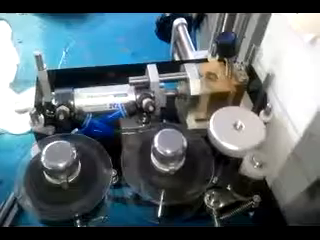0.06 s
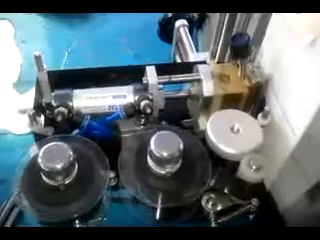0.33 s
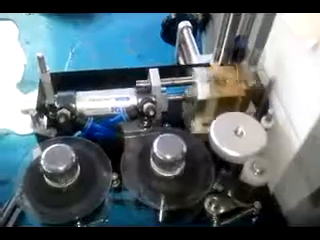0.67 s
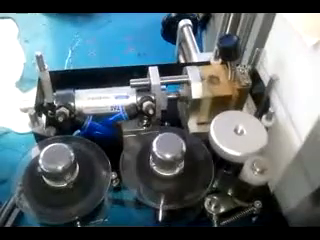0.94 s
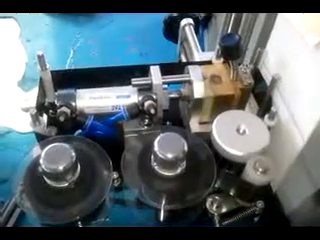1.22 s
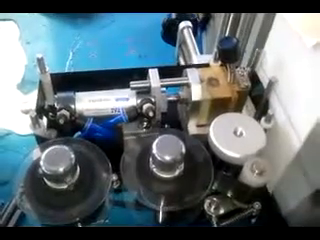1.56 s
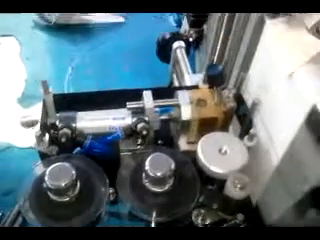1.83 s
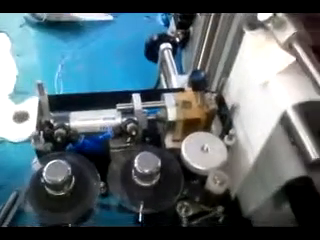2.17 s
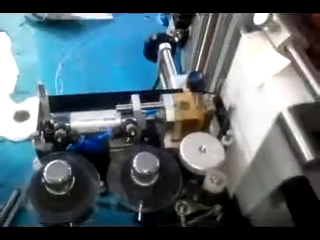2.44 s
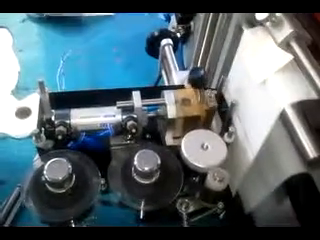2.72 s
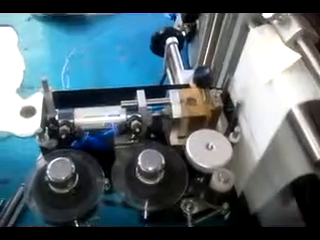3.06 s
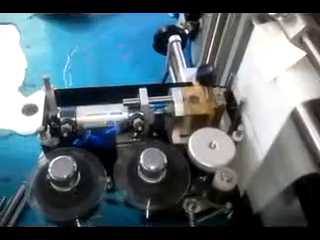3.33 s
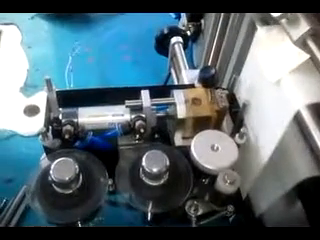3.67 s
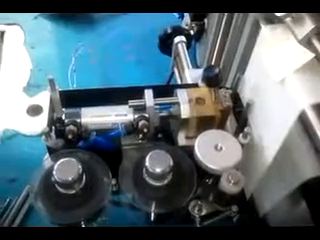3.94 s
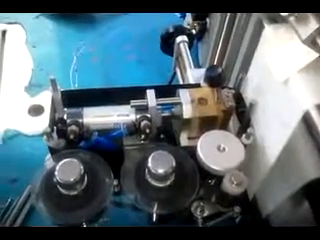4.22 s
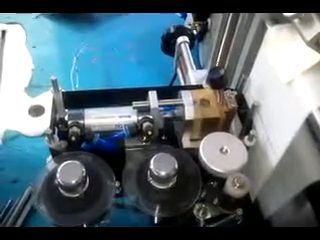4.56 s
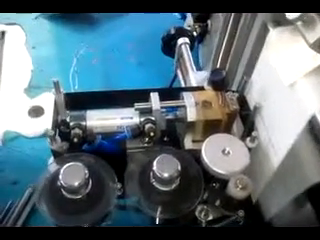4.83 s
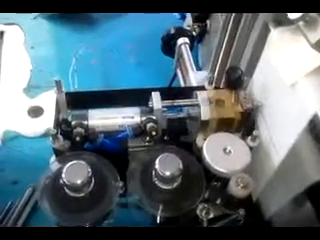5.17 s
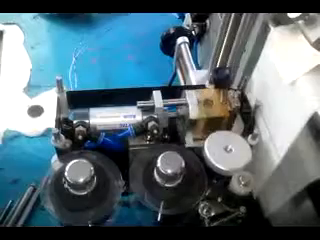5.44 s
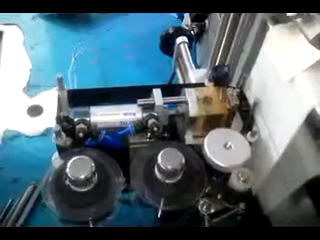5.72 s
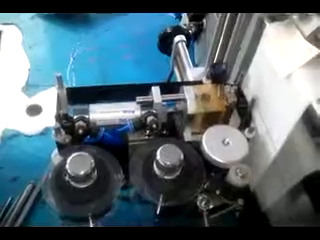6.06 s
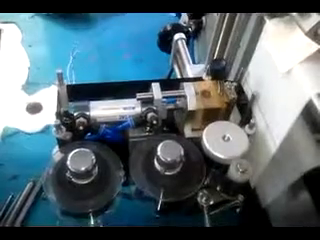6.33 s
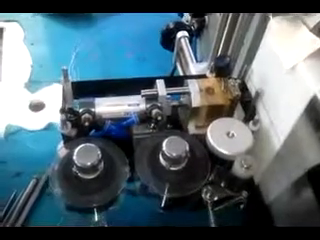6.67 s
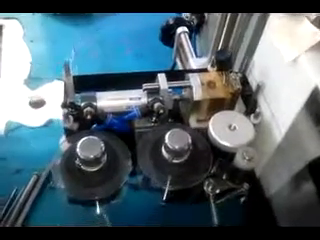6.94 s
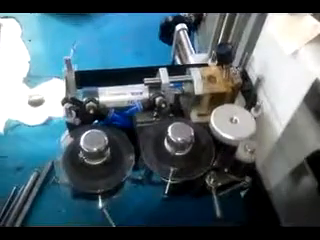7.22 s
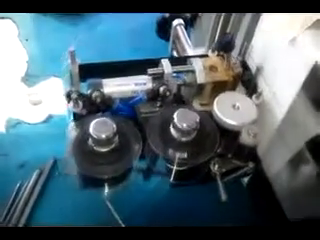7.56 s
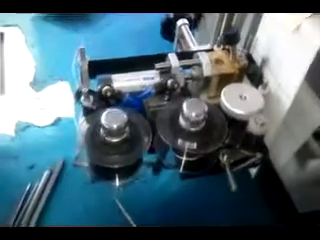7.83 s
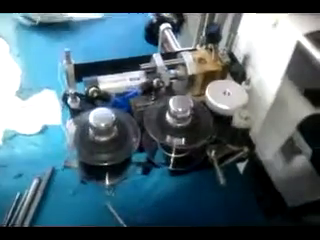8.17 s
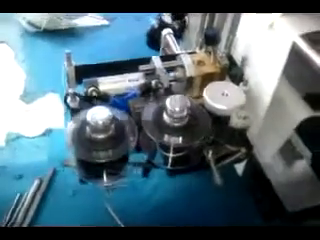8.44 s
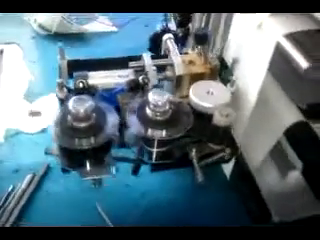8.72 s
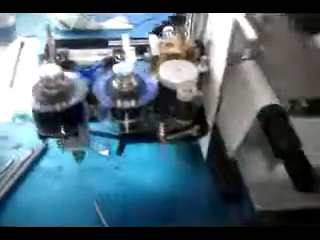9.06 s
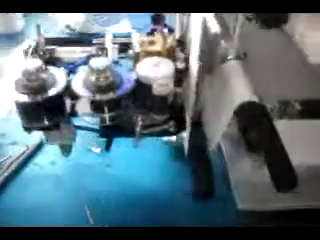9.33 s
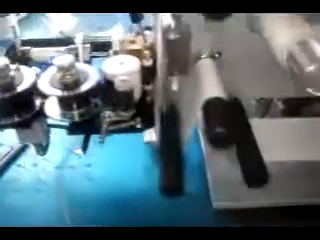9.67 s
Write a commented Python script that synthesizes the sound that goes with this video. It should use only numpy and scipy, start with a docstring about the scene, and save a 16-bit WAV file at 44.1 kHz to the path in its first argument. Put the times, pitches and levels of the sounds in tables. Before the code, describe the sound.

A small pneumatic labelling machine runs close to the microphone in a workshop, with motor hum, fan noise, low rumble and whirring gears throughout. A valve pops with a short hiss right at the start and again at 0.5 seconds, then a metal slide clacks and rebounds at 0.8. A clamp snaps shut at 2.5 seconds amid soft, dull rushes of air. From 3.4 to 4.3 rollers draw the label strip with a grainy rub. The valve pops again at 4.7 and 5.2, with a faint squeak between and several light ticks, and the slide clacks at 5.5. A thin, quiet motor whine follows, fading slowly after the clamp snaps again at 7.1. The rubbing returns from about 7.3 to 8.9. At 9.1 an air jet hisses for half a second, the valve pops once more at 9.3, and a sharp tick follows at 9.7.

```python
"""A pneumatic labelling machine in a small workshop, close to a phone microphone. Over motor hum and
a fan, a solenoid valve pops and vents as the cylinder goes out and back, and the slide clacks on its stop.
The label clamp snaps shut, then rollers draw the rubbing label web. From 4.7 s the cycle runs again,
now with a roller's squeak and a stepper's whine ahead of the clamp. At 9 s an air jet blows
and the valve starts a third cycle."""
import sys
import numpy as np
from scipy import signal
from scipy.fft import irfft, next_fast_len
from scipy.io import wavfile
from scipy.ndimage import uniform_filter1d

SR = 44100
rng = np.random.default_rng(int(sys.argv[2]) if len(sys.argv) > 2 else 0)


def put_to_file(sound):
    """Save the sound as 16-bit audio at rate SR, in the file named by the first command-line argument."""
    columns = np.atleast_2d(sound).T  # one column per channel
    safe = np.clip(columns, -1, 1)
    whole_steps = np.round(safe * 32767)
    wavfile.write(sys.argv[1], SR, whole_steps.astype(np.int16))


N = 431738
TIME = np.arange(N) / SR
AFTER = np.arange(SR // 4) / SR  # seconds after a blow
LEAD_IN_S = .03  # a faint hiss starts this long before each pop
TOP_HZ = 9750  # upper limit of the phone microphone


# click of the solenoid's armature: f/Hz, level/dB
ARMATURE_COLOUR = [(2400, -23), (3400, -6), (4800, -20), (6300, -10), (7100, -4.5), (8000, -4), (9300, -25)]
def valve(switches, flow, port, modes, click_db, knock_db, seat_s, seat_db, pop_db, pop_s):
    """The armature clicks, air vents through the port with a pressure pop, the spool knocks and seats."""
    out = np.zeros(N)
    for s, db in switches:
        gain = amp(db)
        add(out, s - .0112, gain * amp(click_db) * noise(ARMATURE_COLOUR, len(AFTER)) * fade(0.038))
        add(out, s - LEAD_IN_S, gain * noise(port, len(AFTER)) * flow)
        add(out, s, -gain * amp(pop_db) * np.sin(np.pi * AFTER / pop_s) * np.exp(-AFTER / pop_s))
        add(out, s + pop_s / 2, gain * amp(knock_db) * ring(modes, tilt_db=-2.5))
        add(out, s + seat_s, gain * amp(seat_db) * ring(modes))
    return out


def airflow(lead_in_db, gust_db, gust_rise_s, gust_t60,
            puff_s, puff_rise_s, puff_hold_s, puff_db, puff_t60):
    """Envelope of one stroke: a faint hiss, a gust as the chamber vents, a puff as the piston lands."""
    t = AFTER - LEAD_IN_S
    lead_in = amp(lead_in_db) * gate(-LEAD_IN_S, 0, LEAD_IN_S / 2, gust_t60, t)
    gust = amp(gust_db) * gate(0, gust_rise_s, gust_rise_s, gust_t60, t)
    puff = amp(puff_db) * gate(puff_s - puff_rise_s, puff_s + puff_hold_s, puff_rise_s, puff_t60, t)
    return np.sqrt(lead_in ** 2 + gust ** 2 + puff ** 2)


# valve switches for the outward stroke: t/s, level/dB
PUSHES = [(0.0333, -13), (4.735, -12.5), (9.336, -15)]
# its exhaust port: f/Hz, level/dB
PUSH_PORT = [(71, -18), (120, 3), (167, 4), (216, -9.5), (369, -15.5), (486, -17), (909, -9), (1760, -16.5),
             (2010, -10.5), (3480, -12), (3960, -13), (4770, -18), (7010, -11), (8750, -21), (9770, -50),
             (12700, -68), (21500, -120)]
# valve body as it opens: f/Hz, level/dB, t60/s
OPEN_MODES = [(190, -21, 0.018), (722, -8.5, 0.039), (1120, -1.5, 0.048), (1820, -6, 0.044),
              (2546, 2, 0.051), (4160, -1, 0.023), (6830, 6, .02), (7300, 2.5, .02)]
def push_strokes():
    """The valve opens with a short gust and pushes the cylinder out."""
    flow = airflow(lead_in_db=-16.5, gust_db=2, gust_rise_s=0.005, gust_t60=0.03,
                   puff_s=0.036, puff_rise_s=0.03, puff_hold_s=0.017, puff_db=-12, puff_t60=0.073)
    return valve(PUSHES, flow, PUSH_PORT, OPEN_MODES,
                 click_db=-6.5, knock_db=6.5, seat_s=.004, seat_db=3, pop_db=5, pop_s=0.00211)


# valve switches for the return stroke: t/s, level/dB
RETURNS = [(0.5209, -14), (5.2219, -14)]
# its exhaust port: f/Hz, level/dB
RETURN_PORT = [(71, -25), (120, -3), (343, -6.5), (892, -9.5), (1760, 0.5), (2080, -6), (2320, -2),
               (3060, -4.5), (3750, -6.5), (4110, -8), (5620, -12), (6280, -8), (7280, -14), (8590, -15),
               (9770, -47), (12700, -68), (21500, -120)]
# valve body as it shuts: f/Hz, level/dB, t60/s
SHUT_MODES = [(189, -4.5, 0.019), (1020, -8, 0.023), (1850, -13, 0.028), (2240, -2, 0.061),
              (2575, 8, 0.016), (5450, -1, .025), (6950, 6, 0.021), (7540, 0.5, 0.034)]
def return_strokes():
    """The valve shuts with a longer gust and lets the cylinder back."""
    flow = airflow(lead_in_db=-19, gust_db=-2, gust_rise_s=0.00082, gust_t60=0.11,
                   puff_s=.081, puff_rise_s=.014, puff_hold_s=.009, puff_db=-10, puff_t60=0.038)
    return valve(RETURNS, flow, RETURN_PORT, SHUT_MODES,
                 click_db=-8.5, knock_db=8.5, seat_s=0.0083, seat_db=7.5, pop_db=1.5, pop_s=0.00095)


# the machine's frame: f/Hz, level/dB, t60/s
FRAME_MODES = [(1420, 2, .3), (1810, -6, .25), (3661, 0.5, 0.5), (3840, -5, 0.23), (6400, -10, .23)]
def clacks(hits, modes, colour, ring_db, crack_db, crack_t60):
    """Metal cracks on metal and rings, more after a square blow; the frame rings on, loose parts shiver."""
    out = np.zeros(N)
    shiver_colour = [(600, -14.5), (1600, 5.5), (3000, 0.5), (7000, -4.5), (9000, -13)]
    for s, db, tilt_db, square_db, frame_db in hits:
        crack = amp(crack_db) * noise(colour, len(AFTER), tilt_db) * fade(crack_t60)
        body = amp(ring_db + square_db) * ring(modes, tilt_db)
        frame = amp(frame_db) * ring(FRAME_MODES)
        shiver = amp(-20) * noise(shiver_colour, len(AFTER)) * fade(0.2)
        add(out, s, amp(db) * (crack + body + frame + shiver) * onset())
    return out


# blows on the end stop: t/s, level/dB, tilt/(dB/octave), ring/dB, frame/dB
SLIDE_HITS = [(.8052, -19.5, -3.5, -2, -16), (.8451, -6.5, -3.5, -7.5, -26), (.8615, -11, -3, -11, -24.5),
              (5.5489, -9, 2, 4, -30), (5.5645, -18, 0, -1, -27)]
# the slide's ring: f/Hz, level/dB, t60/s
SLIDE_MODES = [(1110, -11, 0.036), (1450, -24, 0.03), (1780, -12, 0.045), (2510, -6, 0.036),
               (3530, -2, 0.039), (3910, 2, 0.034), (4220, 10.5, 0.021), (5730, 0, 0.027),
               (6300, -7.5, 0.022), (7600, -9, 0.019)]
# its crack of many short modes: f/Hz, level/dB
SLIDE_CRACK = [(290, -40), (500, -10.5), (1080, -17), (1490, 5), (1630, -32), (1800, 10.5), (2280, -9),
               (2520, -8), (3190, -2), (4300, -4), (4930, -19), (6240, 3), (8740, -4), (9410, -54),
               (9770, -56), (12700, -81), (21500, -120)]
def slide():
    """The slide meets its end stop and rebounds."""
    return clacks(SLIDE_HITS, SLIDE_MODES, SLIDE_CRACK, ring_db=1, crack_db=-6, crack_t60=0.027)


# blows of the clamp: t/s, level/dB, tilt/(dB/octave), ring/dB, frame/dB
CLAMP_HITS = [(2.5213, -8.5, 2.5, 2, -34), (7.0819, -8.5, 4, 3.5, -34)]
# the clamp's ring: f/Hz, level/dB, t60/s
CLAMP_MODES = [(1320, -18, 0.053), (1787, -0.5, 0.096), (1860, -6, 0.045), (2020, 0.5, 0.04),
               (2530, -5, 0.033), (2840, 2, 0.016), (3390, -5.5, 0.022), (4154, -1.5, 0.031),
               (6500, -0.5, 0.015), (6930, -6, .02), (7930, -6, 0.0064)]
# its crack: f/Hz, level/dB
CLAMP_CRACK = [(290, -51), (500, 2), (1140, -18), (1400, -14), (1610, -11), (1760, 20), (2000, 3),
               (2280, 1), (2460, -34), (3940, -16.5), (4190, -24), (4690, -43), (8110, -5), (9770, -22),
               (12700, -63), (21500, -120)]
def clamp():
    """The label clamp snaps shut against its stop."""
    return clacks(CLAMP_HITS, CLAMP_MODES, CLAMP_CRACK, ring_db=-2.5, crack_db=-1, crack_t60=0.02)


# light ticks, with a short hiss at 2.71 s and a brief rasp at 4.29 s, each one broad resonance: t/s, level/dB,
# centre f/Hz, width/Hz
TICKS = [(2.4834, -23, 4200, 2000), (2.714, -26, 4470, 6000), (3.4157, -22, 5000, 6000),
         (3.4293, -16.5, 6000, 8000), (4.0204, -25, 6950, 5000), (4.2926, -19.5, 3700, 1200),
         (5.1928, -17.5, 4500, 6000), (5.2834, -10, 7100, 3500), (5.3866, -24, 7300, 2000),
         (5.478, -18, 2840, 600), (5.5056, -19, 3700, 1000), (5.521, -20, 7400, 1500),
         (5.5234, -17.5, 3040, 800), (5.7684, -25, 6950, 4000), (5.864, -27, 7040, 3000),
         (5.8977, -26, 6000, 5000), (7.3144, -22, 3400, 3000), (8.015, -22.5, 6500, 5000),
         (8.0335, -19, 6600, 5000), (8.8974, -22.5, 3500, 3000), (9.0875, -15, 2530, 900),
         (9.7269, -9, 1400, 3500)]
def ticks():
    """A faint tick comes just before the clamp's first snap; a short hiss follows at 2.71 s and a brief rasp at
    4.29 s; the other later ones are levers and springs."""
    out = np.zeros(N)
    hz = np.geomspace(300, 10000, num=80)
    rolloff_db = np.interp(hz, [2000, 8000, 10000], [3, 0, -18])
    for s, db, centre_hz, width_hz in TICKS:
        detuning = (hz ** 2 - centre_hz ** 2) / (hz * width_hz)
        colour = np.column_stack([hz, rolloff_db - 12 * np.log10(1 + detuning ** 2)])
        tick = noise(colour, len(AFTER)) * fade(0.016) * onset()
        add(out, s, amp(db) * tick / np.abs(tick).max())
    return out


# stretches of rubbing, the feed's long pulls and one brief soft rub at 4.9 s:
# start t/s, stop t/s, level/dB, tilt/(dB/octave), growth/(dB/s)
RUBS = [(3.42, 4.336, -40.5, 0, 3.5), (4.9, 4.993, -45.5, -4, 0), (5.659, 5.972, -48.5, 6, 4),
        (6.75, 7.067, -49.5, -2.5, -4), (7.312, 8.018, -43.5, -2.5, -15), (8.02, 8.934, -39.5, 2.5, 0)]
# colour of the rubbing: f/Hz, level/dB
RUB_COLOUR = [(900, -10), (1550, -16), (1870, -3), (2150, 1.5), (2750, 4.5), (3250, 0), (4200, -2),
              (5200, -6), (6400, -4), (7400, 0.5), (8300, -7), (9100, -10), (9700, -43)]
def rubbing():
    """Grainy rubbing; in the long pulls the web runs over the rollers and rasps as it tightens."""
    out = np.zeros(N)
    rasp_colour = [(2300, -10), (3000, -2.5), (4000, -5), (4700, -7)]
    rasp_end_db, rasp_db_per_s = -4.5, 14  # relative to the rubbing
    for start, stop, db, tilt_db, db_per_s in RUBS:
        size = int((stop - start) * SR)
        t = start + TIME[:size]
        rasp = noise(rasp_colour, size) * amp(rasp_end_db - rasp_db_per_s * (stop - t))
        rub = noise(RUB_COLOUR, size, tilt_db)
        envelope = amp(db + db_per_s * (t - t.mean())) * signal.windows.tukey(size, .08)
        add(out, start, envelope * (rub + rasp))
    return out * amp(0.63 * walk(300) + 1.3 * walk(13))


# blasts of the air jet: start t/s, stop t/s, level/dB
JETS = [(9.076, 9.535, -24.5), (9.682, 9.76, -37.5)]
# its hiss at the microphone: f/Hz, level/dB
JET_COLOUR = [(65, -34), (110, -12), (179, -4.5), (224, 2), (450, -11), (607, -4.5), (820, -9),
              (1030, -2.5), (1240, -6.5), (2100, -7.5), (2990, -5.5), (4700, -7.5), (6970, -4),
              (8100, -3.5), (9770, -18.5), (12700, -50), (21500, -120)]
def air_jet():
    """The jet opens, blows with a slight flutter and bleeds off."""
    blasts = sum(amp(db) * gate(start, stop, attack_s=0.054, t60=0.67) for start, stop, db in JETS)
    return noise(JET_COLOUR) * blasts * amp(0.34 * walk(90))


# low rushes of air: start t/s, stop t/s, level/dB
RUSHES = [(2.15, 2.563, -40.5), (3.206, 3.75, -42), (4.384, 4.617, -43), (7.227, 7.61, -33.5)]
# their colour: f/Hz, level/dB
RUSH_COLOUR = [(130, -24), (220, 3), (400, -1), (620, -4), (900, -13.5), (1400, -11.5), (2500, -14),
               (4000, -30.5)]
def air_rushes():
    """Dull rushes of air swell, hold and die away."""
    swells = sum(amp(db) * gate(start, stop, attack_s=0.13, t60=1.25) for start, stop, db in RUSHES)
    return noise(RUSH_COLOUR) * swells * amp(1.2 * walk(40))


def bench_boom():
    """Each stroke jolts the bench, which booms on briefly."""
    colour = [(110, -0.5), (160, 3.5), (230, -9), (400, -10)]
    jolts = sum(amp(db - 18.5) * gate(s, s + .02, attack_s=.02, t60=1) for s, db in PUSHES + RETURNS)
    return noise(colour) * jolts


# partials of the stepper's whine: f/Hz, level/dB
WHINE_PARTIALS = [(1650, -11), (2094, -8), (2428, -4.5), (2762, -3), (2900, -7.5), (3060, -11.5),
                  (3671, -1.5), (3860, -14), (4020, -8), (4480, -13.5), (4635, -8), (5790, -15.5),
                  (6570, -11.5)]
def stepper():
    """Partials waver together with the shaft, each with a rough fringe, over a soft hiss."""
    shaft_phase = 2 * np.pi * np.cumsum(1 + 0.000797 * walk(6)) / SR
    whine = sum(amp(db) * (np.sqrt(2) * np.sin(hz * shaft_phase) + amp(-3) * sing(hz, width_hz=42))
                for hz, db in WHINE_PARTIALS)
    hiss = amp(3.5) * noise([(2200, 1), (3000, 1.5), (4500, -2), (7000, -5.5), (9000, -24.5)])
    return amp(-53.5) * (whine + hiss) * gate(5.54, 6.8, attack_s=0.28, t60=8)


def roller_squeak():
    """A guide roller squeaks once."""
    squeak = tone(5405, waver=.0012, flutter_db=1.2, rate=120)
    return amp(-46.5) * squeak * gate(5.04, 5.125, attack_s=0.09, t60=0.21)


# current in the coil: on t/s, off t/s, level/dB
COIL_ON = [(0, 0.914, -41.5), (2.764, 5.54, -36), (7.35, 9.79, -40)]
def coil_buzz():
    """A coil buzzes at twice the mains rate while it is switched on."""
    powered = sum(amp(db) * gate(on, off, attack_s=0.086, t60=.2) for on, off, db in COIL_ON)
    return tone(100, waver=0.00089, flutter_db=0.45, rate=3.7) * powered


def drive(load_db):
    """Friction rings the drive housing; during each rub its low note gains and a high one joins."""
    in_rub = np.max([gate(start, stop, attack_s=.05, t60=1) for start, stop, *_ in RUBS], axis=0)
    low = sing(1851, width_hz=110) * amp(load_db - 10 + 3.5 * in_rub)
    high = sing(2727, width_hz=90) * amp(-52.5) * in_rub
    return low + high


# motor and fan tones: f/Hz, level/dB
HUM_TONES = [(53.8, -39.5), (74, -48), (149.5, -52.5), (441.4, -65), (538.3, -59), (635.2, -52.5),
             (716, -71.5), (872, -55.5), (1227, -62.5)]
def motor_hum():
    """Motor and fan hum throughout, each tone wavering slightly."""
    return sum(amp(db) * tone(hz, waver=0.0031, flutter_db=1.5, rate=7) for hz, db in HUM_TONES)


# the bench's rumble: f/Hz, level/dB
RUMBLE_COLOUR = [(15, -9.5), (25, 2), (40, -5.5), (60, -5), (85, -19.5), (130, -26), (220, -31)]
def bench_rumble():
    """The bench rumbles throughout and swells once, around 3.3 s."""
    swell_db = 4 * np.exp(-((TIME - 3.27) / 0.64) ** 2)
    return noise(RUMBLE_COLOUR) * amp(-31.5 + swell_db)


# the fan's draught: f/Hz, level/dB
FAN_COLOUR = [(65, -32), (110, -6.5), (140, 0), (363, -11), (440, -8), (485, -11.5), (600, -12.5),
              (617, -11.5), (727, -7), (1100, -18), (1430, -30), (2420, -120)]
def fan(load_db):
    """The fan blows, its level following a share of the load's swing."""
    return noise(FAN_COLOUR) * amp(-40 + 0.29 * (load_db - load_db.mean()) + walk(8.3))


# the gearing's whirr: f/Hz, level/dB
GEAR_COLOUR = [(700, -4.5), (1000, -0.5), (1250, 0.5), (1600, -0.5), (1870, 2), (2200, 0.5), (2700, -2),
               (3300, -8.5), (4500, -12.5), (7300, -14), (8300, -16.5), (9000, -43)]
def gearing(load_db):
    """The gears run on, louder under load."""
    return noise(GEAR_COLOUR) * amp(load_db + 2.5 + 0.78 * walk(60))


# level of the running gear as the load changes: t/s, level/dB
LOAD = [(0.0, -43.5), (0.83, -44), (1.01, -48), (1.81, -48), (2.49, -43.5), (3.15, -46), (3.58, -41.5),
        (4.69, -45.5), (5.29, -43.5), (6.13, -50), (7.16, -47.5), (7.44, -44.5), (8.62, -42), (9.05, -42.5)]
def running_machine():
    """The bed behind the strokes; drive, fan and gearing follow the load."""
    load_db = np.interp(TIME, *np.transpose(LOAD))
    tones = motor_hum() + coil_buzz() + roller_squeak() + drive(load_db)
    return tones + bench_rumble() + fan(load_db) + gearing(load_db)


def room(x, db):
    """Panels and walls near the microphone answer with a short dense tail."""
    colour = [(150, 1.5), (1500, -2.5), (4000, 0), (10000, 0.5)]
    tail = noise(colour, len(AFTER)) * fade(t60=0.36) * (AFTER > .004)
    tail /= np.sqrt(np.sum(tail ** 2) * SR / (2 * TOP_HZ))  # about unity gain in the microphone's band
    return x + amp(db) * signal.fftconvolve(x, tail)[:N]


def amp(db):
    """Decibels to gain."""
    return np.exp(np.asarray(db) * np.log(10) / 20)


def unit(x):
    """Scale to rms 1."""
    return x / np.sqrt(np.mean(x ** 2))


def add(track, s, sound):
    """Mix a sound into the track at time s."""
    start = max(int(s * SR), 0)
    part = sound[:N - start]
    track[start:start + len(part)] += part


def noise(colour, size=N, tilt_db=0):
    """Noise of rms 1 with a colour (f/Hz, level/dB) that falls 30 dB an octave beyond its ends."""
    hz, db = np.transpose(colour)
    length = next_fast_len(size)
    octave = np.log2(np.maximum(np.fft.rfftfreq(length, 1 / SR), 1))
    outside = np.abs(octave - np.clip(octave, np.log2(hz[0]), np.log2(hz[-1])))
    gain = amp(np.interp(octave, np.log2(hz), db) + tilt_db * octave - 30 * outside)
    return unit(irfft(gain * np.exp(2j * np.pi * rng.random(len(gain))), length)[:size])


def walk(rate):
    """Smooth random drift of rms 1 that turns rate times a second."""
    step = int(SR / rate)
    return unit(uniform_filter1d(np.repeat(rng.standard_normal(N // step + 2), step), step)[:N])


def onset():
    """The quick rise of a blow."""
    return 1 - np.exp(-AFTER / 0.00032)


def fade(t60):
    """Exponential decay after a blow."""
    return np.exp(-np.log(1000) * AFTER / t60)


def gate(start, stop, attack_s, t60, t=TIME):
    """Rise from start, hold until stop, then die away."""
    return np.clip((t - start) / attack_s, 0, 1) * np.exp(-np.log(1000) * np.maximum(t - stop, 0) / t60)


def ring(modes, tilt_db=0):
    """Damped modes with peak 1; no two blows land on quite the same spot."""
    out = np.zeros(len(AFTER))
    for k, (hz, db, t60) in enumerate(modes):
        scatter_db, detune = rng.standard_normal(2) * (0.87, 0.0036)
        gain = (-1) ** k * amp(db + scatter_db + tilt_db * np.log2(hz))
        out += gain * fade(t60) * np.sin(2 * np.pi * hz * (1 + detune) * AFTER)
    return out / np.abs(out).max()


def tone(hz, waver, flutter_db, rate):
    """A sine of rms 1 that wavers in pitch and level."""
    phase = 2 * np.pi * np.cumsum(hz * (1 + waver * walk(rate))) / SR
    return unit(np.sin(phase) * amp(flutter_db * walk(rate)))


def sing(hz, width_hz):
    """A narrow resonance kept ringing by friction; rms near 1."""
    phase = 2 * np.pi * hz * TIME
    return walk(2 * width_hz) * np.cos(phase) + walk(2 * width_hz) * np.sin(phase)


def scene():
    """Close up, in mono: strokes and their reflections over the machine's steady running."""
    valves = push_strokes() + return_strokes()
    metal = slide() + clamp()
    strokes = room(valves + ticks(), db=-6) + room(metal, db=-11) + bench_boom()
    return (strokes + rubbing() + air_jet() + air_rushes() + stepper() + running_machine())[None]


def record(dry):
    """The phone, close to the machine, rounds the loudest peaks and cuts the top."""
    rounded = np.tanh(0.87 * dry) / 0.93
    return signal.sosfilt(signal.ellip(10, .2, 80, TOP_HZ, fs=SR, output="sos"), rounded)


dry = scene()
out = record(dry)
put_to_file(out)
```